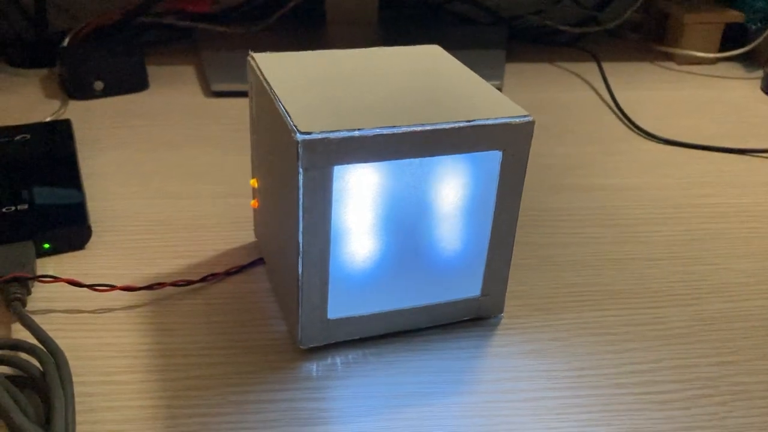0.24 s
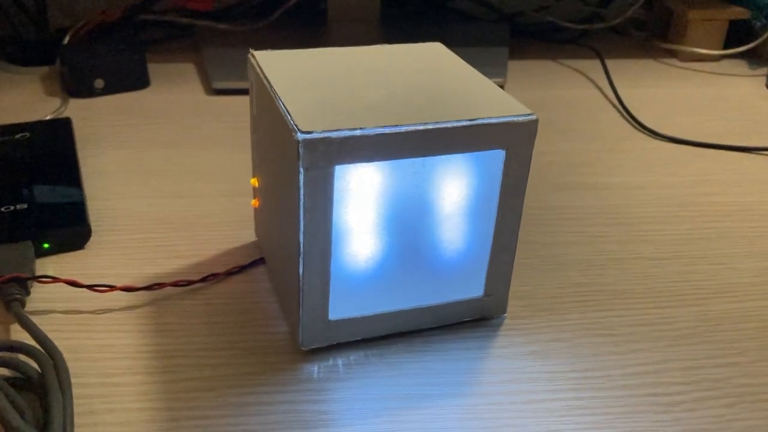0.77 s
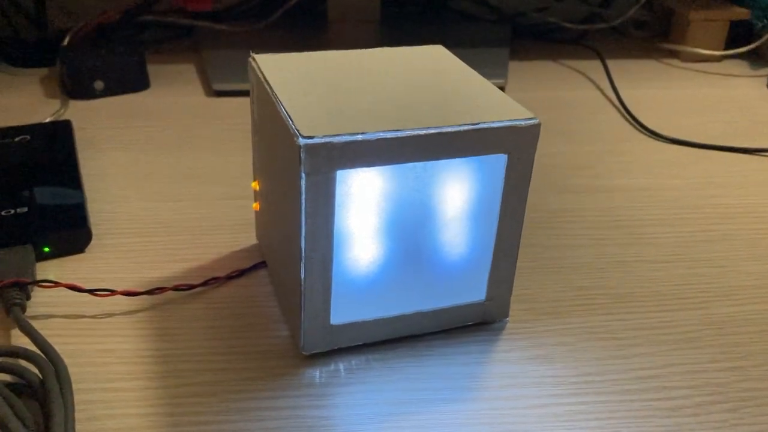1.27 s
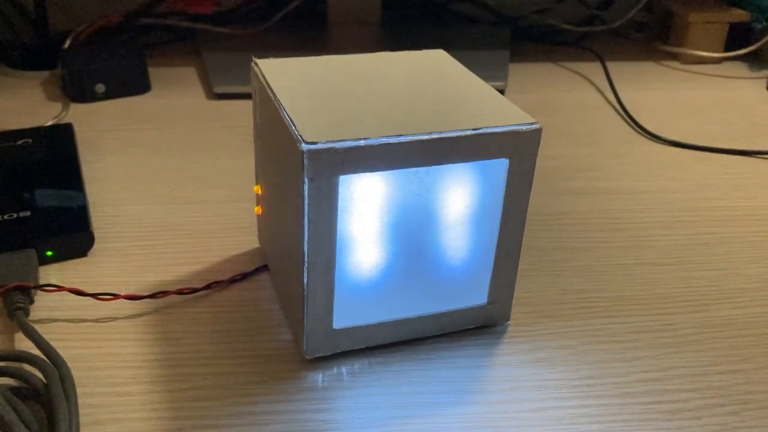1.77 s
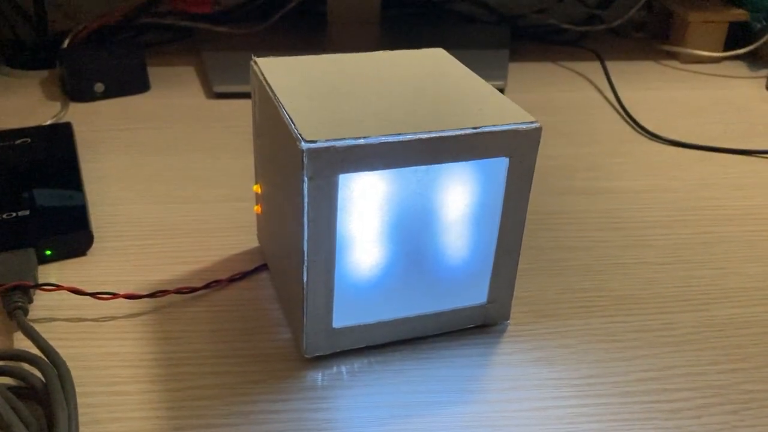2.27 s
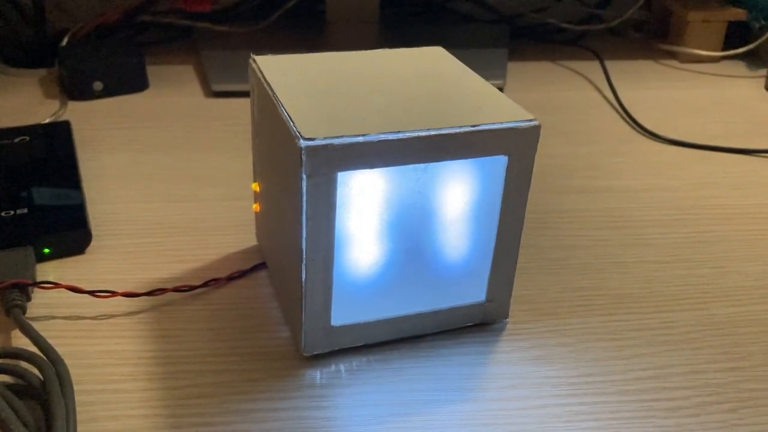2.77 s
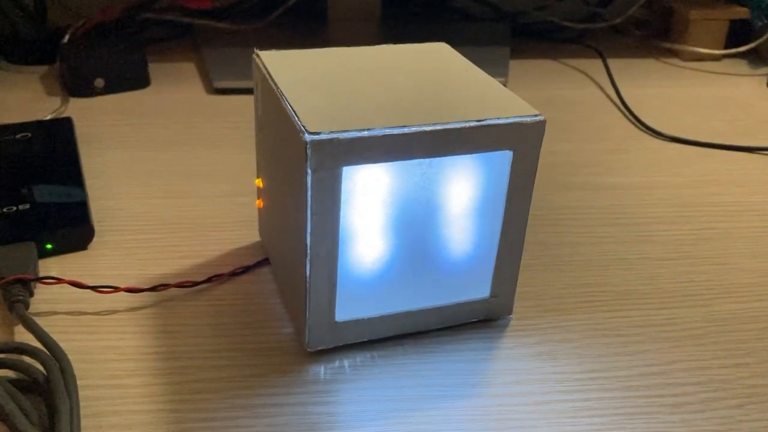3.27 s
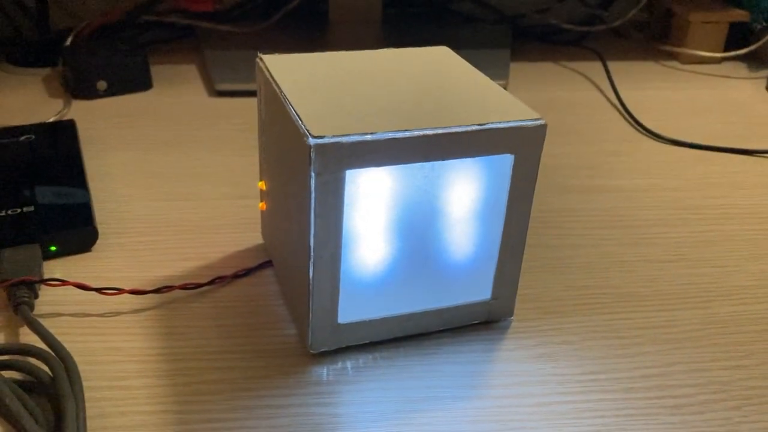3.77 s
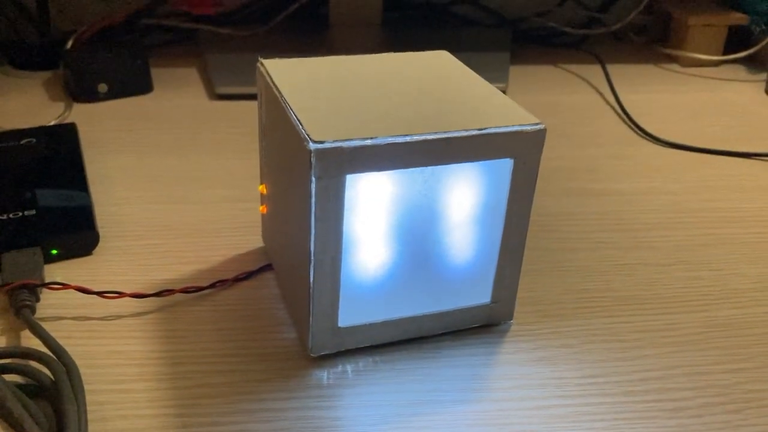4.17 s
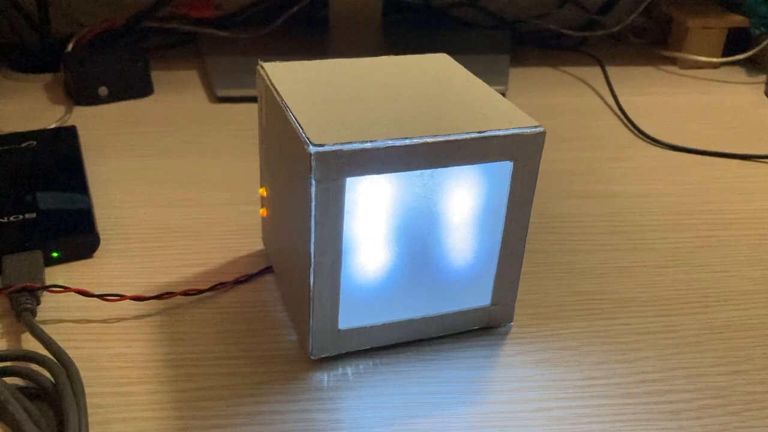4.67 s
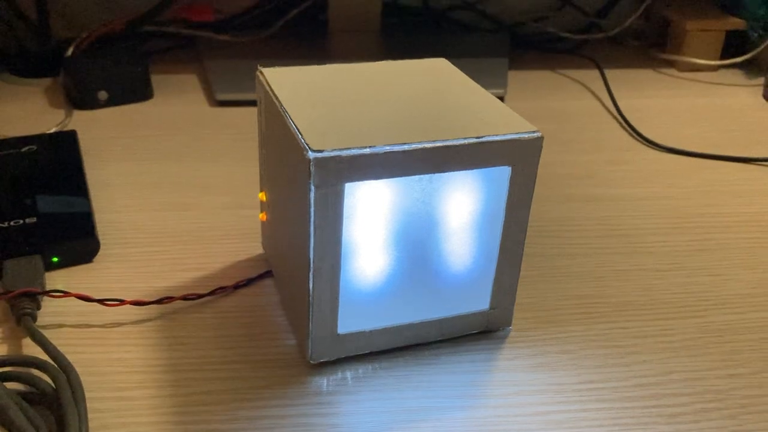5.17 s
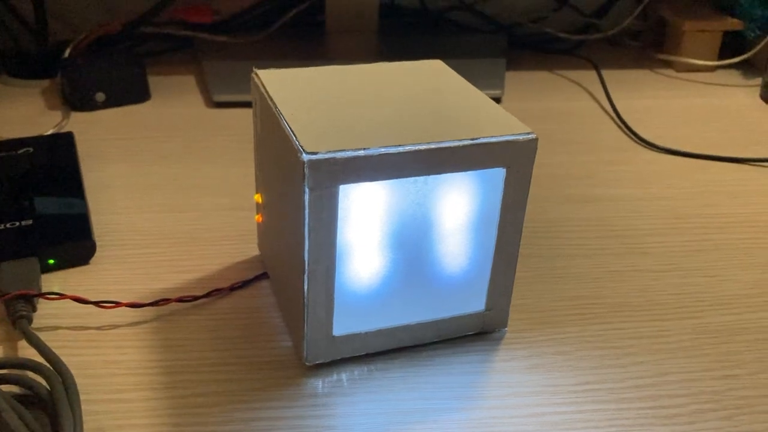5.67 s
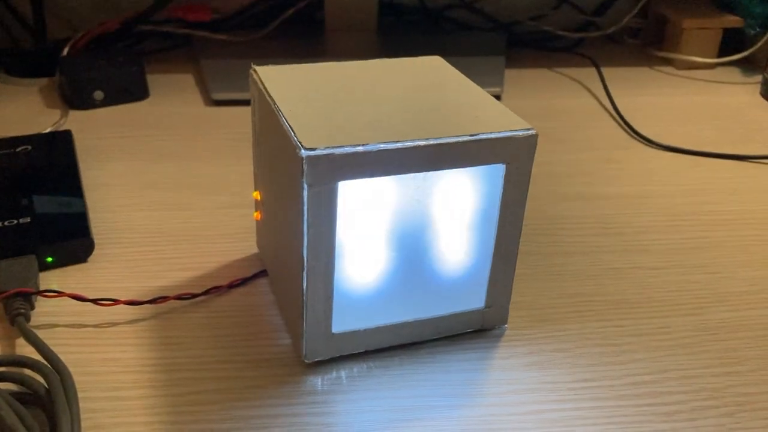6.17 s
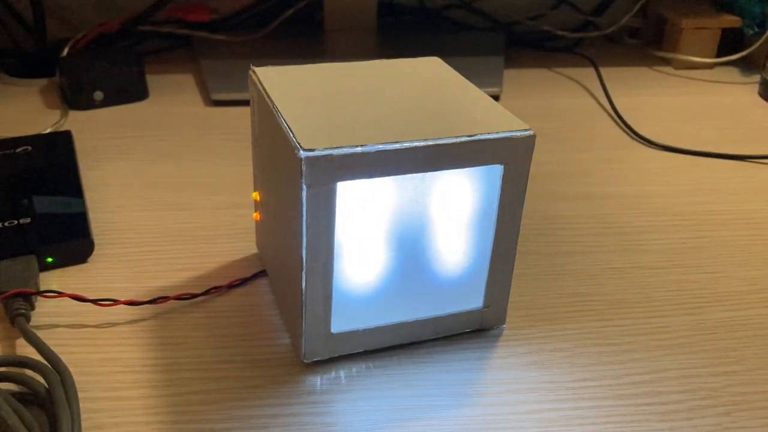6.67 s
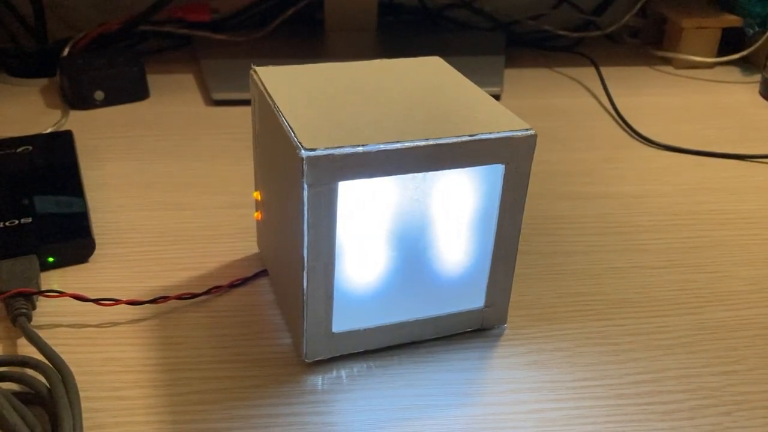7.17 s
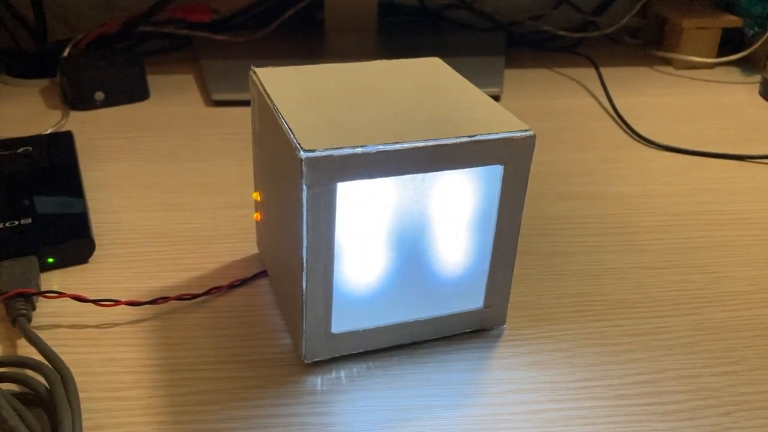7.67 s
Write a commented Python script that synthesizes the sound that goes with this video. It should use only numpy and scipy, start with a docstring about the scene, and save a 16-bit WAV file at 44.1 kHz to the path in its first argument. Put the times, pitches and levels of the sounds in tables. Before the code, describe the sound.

A low electrical hum throbs about once a second under dull fan air in a quiet room, with a very faint high whine.

```python
"""A quiet room with a lit cardboard box on a desk. From the start a low mains hum beats against a motor about
once a second, a fan's air noise rings low resonances, and the box's power converter whines faintly near
12 kHz, pulled in pitch by the scan of its display. A few tiny ticks sound close by within the first second.
The display's load dips from 0.88 s on, every 2 s; at 4.08 s a lighter picture makes the whine softer."""
import sys
import numpy as np
from scipy import signal
from scipy.fft import rfft, irfft
from scipy.io import wavfile
from scipy.ndimage import uniform_filter1d

SR = 44100
rng = np.random.default_rng(int(sys.argv[2]) if len(sys.argv) > 2 else 0)


def to_wav(s):
    """Save 16-bit WAV."""
    ch = np.atleast_2d(s).T  # columns
    pcm = np.round(np.clip(ch, -1, 1) * 32767)  # PCM
    wavfile.write(sys.argv[1], SR, pcm.astype(np.int16))


N = 349272

TIME = np.arange(N) / SR
FREQ = np.maximum(np.fft.rfftfreq(N, 1 / SR), 1)  # Hz, floored at 1 to keep logs and ratios finite
SIDES = np.array([[1], [-1]])  # left, right

CHANGE_S = 4.08  # the display turns to a lighter picture


def undb(db):
    """Decibels to gain."""
    return 10 ** (np.asarray(db) / 20)


def noise(gain):
    """Fresh white noise shaped by the given gain at each frequency."""
    return irfft(rfft(rng.standard_normal(N)) * gain, N)


def resonance(hz, width_hz):
    """Gain of a resonant peak, scaled so that white noise keeps unit power."""
    detune = (FREQ - hz) / width_hz * (1 + hz / FREQ) / 2
    gain = 1 / (1 + (detune * np.sqrt(2)) ** 2)
    return gain / np.sqrt(np.mean(gain ** 2))


def walk(rate):
    """Random levels held 1 / rate s and smoothed twice; spread near 1."""
    hold = int(SR / rate)
    steps = np.repeat(rng.standard_normal(N // hold + 1), hold)
    return 1.7 * uniform_filter1d(uniform_filter1d(steps, hold), hold)[:N]


def across_spectrum(points):
    """Each column of a table by frequency, joined over the spectrum along log frequency."""
    hz, *columns = np.transpose(points)
    return [np.interp(np.log(FREQ), np.log(hz), column) for column in columns]


def standing_waves(ripple_db=1.8, size=200):
    """The room's standing waves lift some narrow bands and sink others, fully from 1 kHz up."""
    ripple = uniform_filter1d(uniform_filter1d(rng.standard_normal(len(FREQ)), size), size)
    return undb(ripple_db * ripple / ripple.std() * np.clip(FREQ / 1000, 0, 1))


def eddies(air, flicker_db=0.81, flicker_rate=8):
    """The air flow is uneven: each of five overlapping octave bands flickers on its own."""
    octave = np.clip(np.log2(FREQ / 300), 0, 4)  # the end bands take in all below and above
    spectrum = rfft(air)
    out = 0
    for k in range(5):
        band = irfft(spectrum * np.maximum(1 - np.abs(octave - k), 0), N)
        out = out + band * undb(flicker_db * walk(flicker_rate))
    return out


def fan():
    """Air rush with narrow resonances reaches one side first; the room scatters part of the rush to both."""
    # the rush of the fan's air: f/Hz, level/dB per Hz
    air_rush = [(25, -112), (40, -96.5), (90, -83.5), (170, -78.5), (300, -84), (460, -87.5), (600, -92),
                (800, -94.5), (1050, -95), (1400, -100), (1600, -99.5), (1900, -101.5), (2200, -101),
                (2600, -104.5), (3150, -111), (3700, -112), (4300, -116.5), (5200, -122), (7500, -123),
                (9200, -129), (10800, -122.5), (13000, -128)]
    # resonances rung by the air flow: f/Hz, width/Hz, level/dB
    drone_peaks = [(52.7, 7, -64.5), (75, 12, -54), (94, 4.3, -57), (107.8, 7.9, -47), (115.5, 13, -49),
                   (152.7, 6.5, -64.5), (204.2, 26, -54), (230.2, 23, -56.5), (270, 9, -69),
                   (315.5, 11, -62), (323, 51, -76.5), (409.5, 6, -69.5), (483, 51, -67.5),
                   (516, 15, -72.5), (626.7, 16, -73.5), (712, 20, -79), (766, 20, -78), (830, 24, -83.5),
                   (936.6, 28, -77.5), (1030, 15, -81.5), (1170, 70, -78), (1310, 55, -80.5),
                   (2360, 45, -90), (3480, 340, -86)]
    # where the fan is heard: f/Hz, left minus right/dB, left leads by/rad, share of the rush arriving directly/0-1
    fan_place = [(40.2, -2, 0, .1), (101, .7, 0.18, .5), (200, -0.5, 0, 0.2), (345, -1, 0.5, 0.4),
                 (520, 0.5, -0.45, .05), (630, 3.5, 1, .05), (960, 2.1, 0.84, .2), (1310, 1.9, 3, 0),
                 (1450, 0.5, 3, 0), (1800, -1, 3, 0.7), (2400, 0, 4, .3), (3040, 0, 4.1, 0.3),
                 (4200, 0, 6, 0), (5300, -0.5, 8, 0.6), (8500, -1, 8.5, 0.1), (11500, -0.5, 5.5, 0)]

    air_db, = across_spectrum(air_rush)
    lean_db, lead, direct_share = across_spectrum(fan_place)
    direct_share = np.clip(direct_share, 0, 1)
    rush = undb(air_db) ** 2 * SR / 2  # power per Hz to power of the shaped noise
    drone = sum((undb(db) * resonance(hz, width)) ** 2 for hz, width, db in drone_peaks)
    direct = noise(np.sqrt(drone + direct_share * rush * standing_waves() ** 2))
    direct = rfft(direct) * np.exp(1j * SIDES * lead / 2)
    # each side gets its own scattered noise
    scattered = rfft([noise(np.sqrt((1 - direct_share) * rush) * standing_waves()) for _ in SIDES])
    return eddies(irfft((direct + scattered) * undb(SIDES * lean_db / 2), N))


def hum(mains_db=-42.0, octave_db=-2.5, motor_db=1.74, motor_octave_db=-59, flutter_db=-50,
        pan_db=0.68, octave_pan_db=-2, octave_rough_db=1, port_phase=-0.07):
    """The steady mains hum beats against a slipping motor, their octaves twice as fast; a second fan flutters."""
    # a motor runs just under the mains hum: t/s, slip/Hz, level before the motor_db trim/dB
    motor_slip = [(0.0, 1.06, -39.8), (0.9, 1.12, -40.2), (1.7, 1.48, -44.2), (2.4, 1.28, -45.8),
                  (3.2, 1.36, -39.9), (4.1, 1.27, -40.4), (5.2, 0.85, -41.6), (5.9, 1.09, -40.5),
                  (7.92, 1.05, -42.2)]
    # the hum's octave swells and sinks: t/s, level before the octave_db trim/dB
    octave_swell = [(0.0, -60), (0.22, -46), (0.4, -53.5), (0.58, -64.5), (0.75, -54.5), (1.37, -58),
                    (1.57, -43), (1.79, -62), (1.95, -54.5), (2.4, -61), (2.65, -51), (3.55, -56),
                    (3.77, -49.5), (4.05, -56.5), (4.83, -53), (5.3, -64.5), (5.6, -46.5), (5.82, -48.5),
                    (6.0, -52.5), (6.85, -56), (7.2, -43), (7.38, -54), (7.54, -43.5), (7.74, -53.5),
                    (7.92, -49)]
    mains_hz = 100.07  # iron vibrates at twice the supply frequency
    flutter_hz = 3.205  # how far the second fan runs above the mains hum
    throb_s, flutter_s = .728, .167  # first crests of the slow throb and the quick flutter

    s, slip_hz, level_db = np.transpose(motor_slip)
    beats = np.cumsum(np.interp(TIME, s, slip_hz)) / SR
    mains = 2 * np.pi * mains_hz * TIME + SIDES * port_phase / 2  # phases in rad
    motor = mains - 2 * np.pi * (beats - np.interp(throb_s, TIME, beats))
    second_fan = mains + 2 * np.pi * flutter_hz * (TIME - flutter_s)

    low = undb(mains_db) * np.cos(mains)
    low = low + undb(np.interp(TIME, s, level_db) + motor_db) * np.cos(motor)
    low = low + undb(flutter_db) * np.cos(second_fan)

    swell_db = np.interp(TIME, *np.transpose(octave_swell)) + octave_db
    high = undb(swell_db + octave_rough_db * walk(24)) * np.cos(2 * mains)
    high = high + undb(motor_octave_db) * np.cos(2 * motor)
    # sqrt(2) makes the levels RMS; the octaves are inverted
    return np.sqrt(2) * (low * undb(SIDES * pan_db / 2) - high * undb(SIDES * octave_pan_db / 2))


def waver(sound):
    """The bass dips and swells briefly, each time along a smooth bell."""
    # brief dips and swells: t of the middle/s, length/s, change/dB
    bass_wavers = [(0.173, 0.1, -7.5), (0.47, 0.053, 5), (0.857, 0.035, -15), (0.92, 0.077, 6),
                   (1.182, 0.068, -21), (1.285, 0.048, 0), (1.452, 0.093, -4), (1.611, 0.19, -2.5),
                   (1.79, 0.077, -6), (1.908, 0.034, -4), (2.004, 0.18, 3.5), (2.283, 0.053, -6.5),
                   (2.343, 0.049, 2), (2.446, 0.065, -3), (2.57, 0.025, -6.5), (2.658, 0.046, -1),
                   (2.857, 0.053, -11), (2.98, 0.13, -1), (3.16, 0.034, -7), (3.236, 0.066, 5),
                   (3.36, 0.043, -2.5), (3.743, 0.06, -9.5), (3.967, 0.07, -9), (4.245, 0.052, -9),
                   (4.283, 0.066, 5), (4.436, 0.025, -4.5), (4.54, 0.069, 2.5), (4.914, 0.032, -14),
                   (5.03, 0.023, -12.5), (5.115, 0.035, -3), (5.192, 0.026, -13), (5.288, 0.025, -10),
                   (5.458, 0.11, -9.5), (5.829, 0.068, 5), (5.886, 0.08, -9), (6.581, 0.28, -2),
                   (6.925, 0.059, -21), (7.06, 0.1, 7.5), (7.235, 0.023, -4), (7.653, 0.1, -7),
                   (7.733, 0.034, 12), (7.822, 0.057, 4.5)]
    low_hz, high_hz = 61.3, 136  # the wavering fades out below and above

    change_db = sum(db * np.exp(-(2 * (TIME - s) / length) ** 2) for s, length, db in bass_wavers)
    bass = irfft(rfft(sound) / (1 + (low_hz / FREQ) ** 8 + (FREQ / high_hz) ** 8), N)
    return sound + (undb(change_db) - 1) * bass


def ticks(t60=0.0029):
    """Each tick is one sharp snap whose ring dies away within about a dozen cycles."""
    # tiny ticks: t/s, peak level/dB, ring f/Hz, left minus right/dB
    snaps = [(0.3704, -61.5, 4000, -7), (.6338, -61, 4200, -5), (.7517, -62, 3290, -10.5),
             (.8819, -63, 3930, -3)]
    out = np.zeros((2, N))
    for s, db, ring_hz, pan_db in snaps:
        age = np.maximum(TIME - s, 0)
        decay = np.exp(-np.log(1000) * np.minimum(age / t60, 2))  # falls 60 dB per t60, held at -120 dB
        out += undb(db + SIDES * pan_db / 2) * np.sin(2 * np.pi * ring_hz * age) * decay
    return out


def display_load():
    """Share of the full current that the display draws: it dips regularly and drops with the lighter picture."""
    dip_first_s, dip_every_s, dip_s = .88, 2, .19
    dip_load, light_load = .58, .53  # shares, which multiply
    dipping = (TIME - dip_first_s) % dip_every_s < dip_s
    return np.where(TIME < CHANGE_S, 1, light_load) * np.where(dipping, dip_load, 1)


def converter(full_db=-75.5, light_db=-79.0, wander_hz=3):
    """A coil sings at the switching rate; each display scan loads it, making it lower and louder."""
    scan_hz = 88.9  # display scans a second
    idle_hz, sag_hz = 12680, 222  # pitch when idle, and what full load takes off
    idle_swing_hz, load_swing_hz = 160, 211  # pitch swing when idle, and what full load adds
    load_depth, unevenness = .5, .12
    echo, echo_s = .55, .002824  # gain and delay
    port_phase = -1.66  # rad, left minus right

    draw = display_load()
    centre = idle_hz - sag_hz * draw
    swing = idle_swing_hz + load_swing_hz * draw
    db = np.where(TIME < CHANGE_S, full_db, light_db)
    scan = 2 * np.pi * scan_hz * TIME
    # the rows of the display draw unequal currents within one scan
    rows = .07 * np.sin(4 * scan) + .15 * np.sin(5 * scan)
    load = np.cos(scan) + rows
    # a heavier load also makes the switching less regular, and its rate wanders slowly
    jitter = unevenness * draw ** 2 * noise(resonance(40, 160))
    wander = wander_hz * noise(resonance(0.95, 1.7))
    phase = 2 * np.pi * np.cumsum(centre + wander - swing * (load + jitter)) / SR
    loudness = undb(db) * (1 + load_depth * draw ** 2 * load + rows)
    coil = loudness * np.sin(phase + SIDES * port_phase / 2)
    # an echo from a nearby surface turns the pitch sweep into flutter
    return np.sqrt(2) * irfft(rfft(coil) * (1 + echo * np.exp(-2j * np.pi * FREQ * echo_s)), N)


def scene():
    """Wavering fan and hum, ticks and converter whine together."""
    return waver(fan() + hum()) + ticks() + converter()


def record(dry):
    """The phone cuts the top with a steep low-pass."""
    top_hz = 12920
    low_pass = signal.ellip(10, .2, 70, top_hz, fs=SR, output="sos")  # ripple and stop-band depth in dB
    return signal.sosfilt(low_pass, dry)


dry = scene()
out = record(dry)
to_wav(out)
```